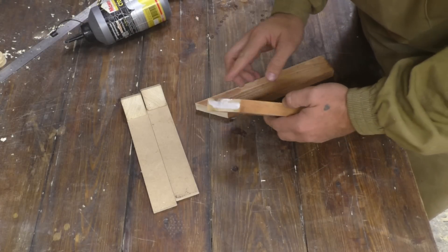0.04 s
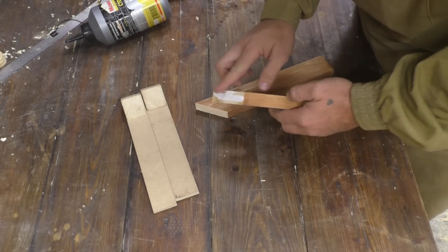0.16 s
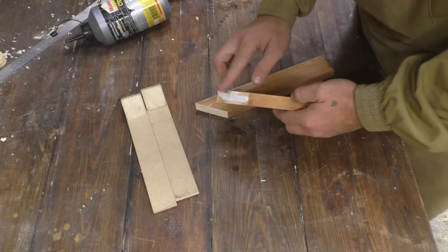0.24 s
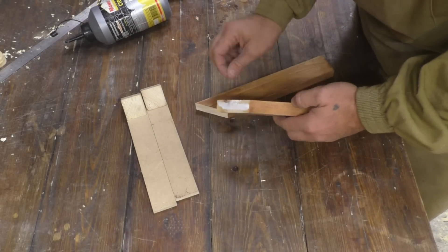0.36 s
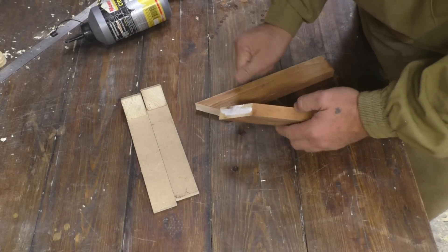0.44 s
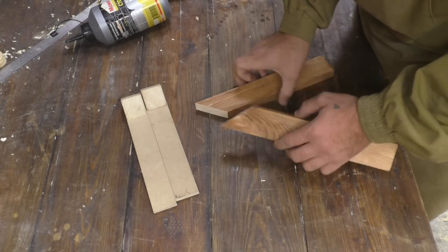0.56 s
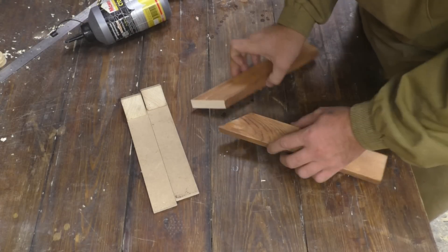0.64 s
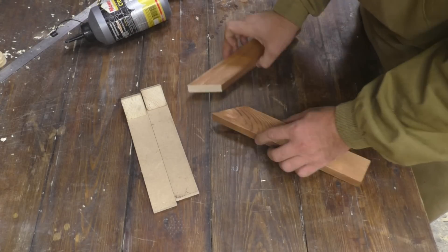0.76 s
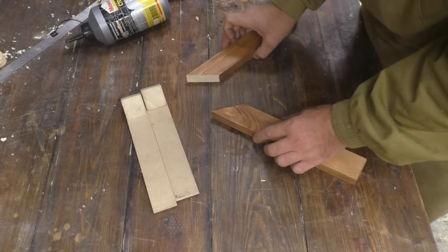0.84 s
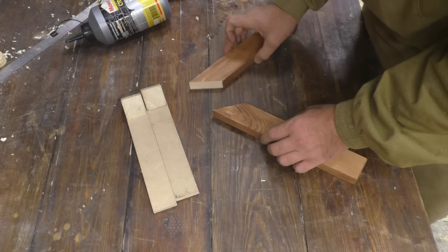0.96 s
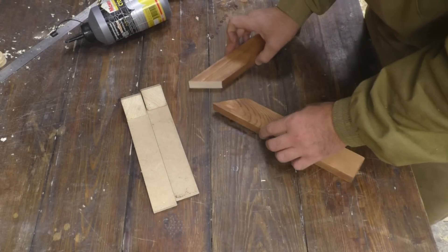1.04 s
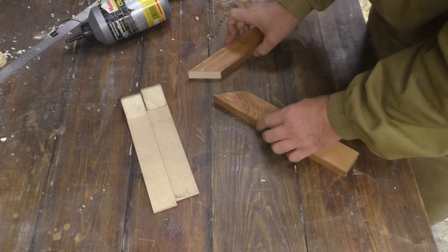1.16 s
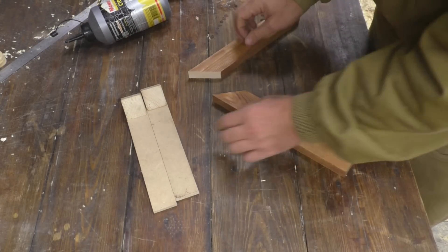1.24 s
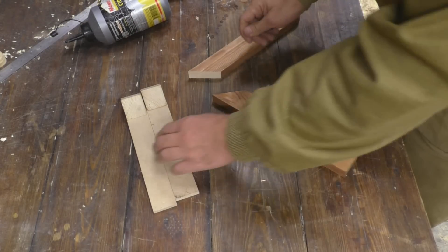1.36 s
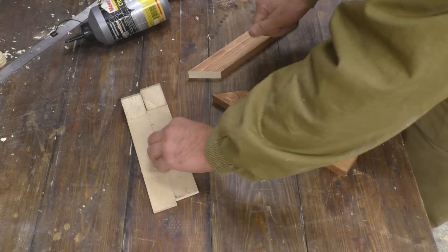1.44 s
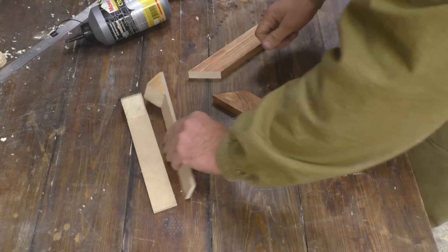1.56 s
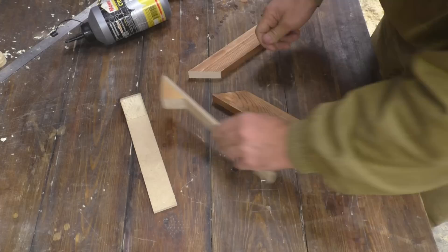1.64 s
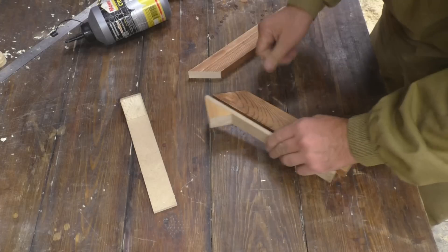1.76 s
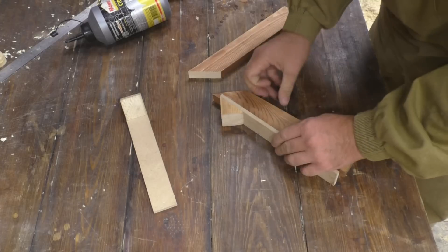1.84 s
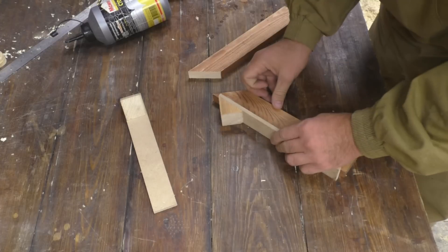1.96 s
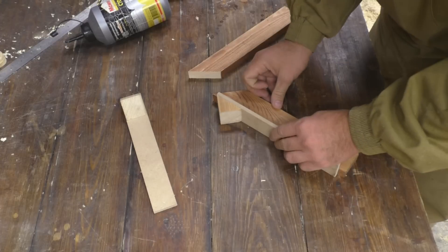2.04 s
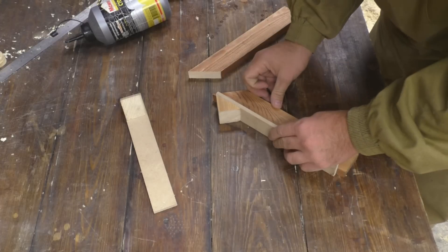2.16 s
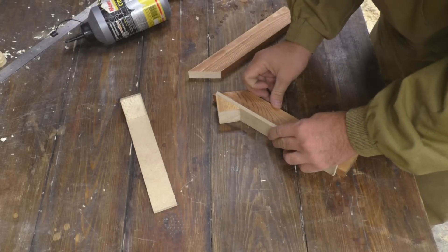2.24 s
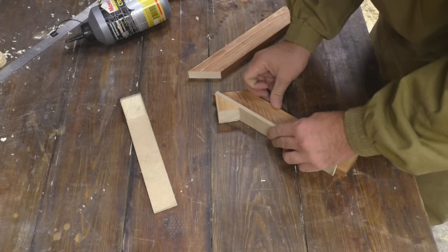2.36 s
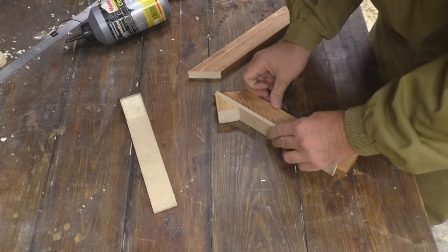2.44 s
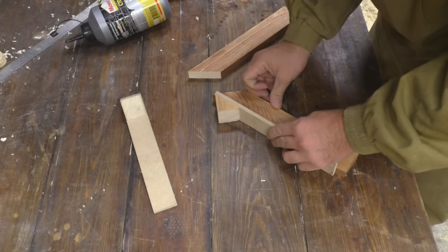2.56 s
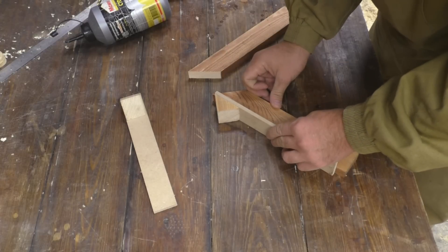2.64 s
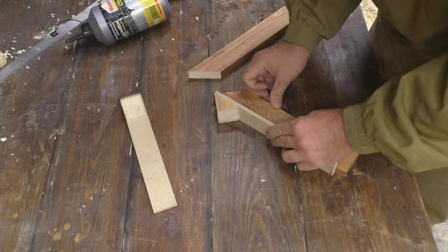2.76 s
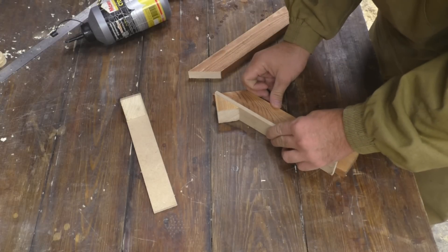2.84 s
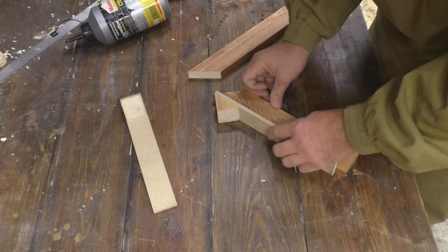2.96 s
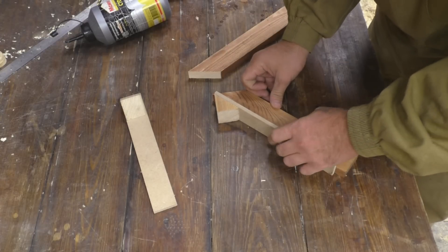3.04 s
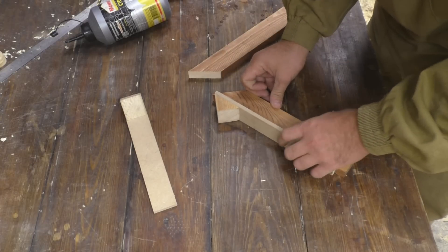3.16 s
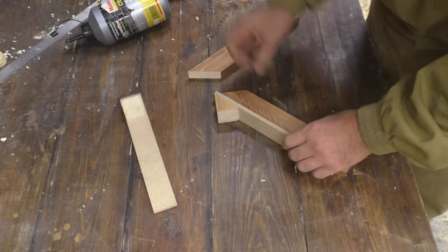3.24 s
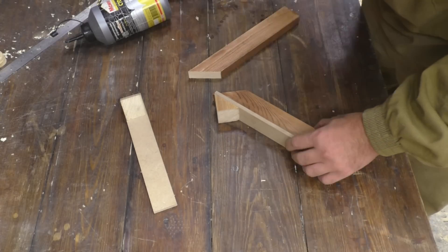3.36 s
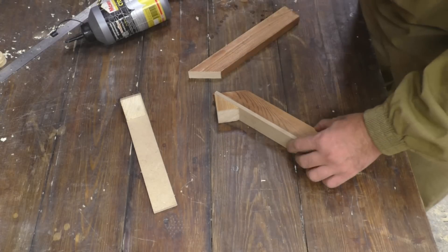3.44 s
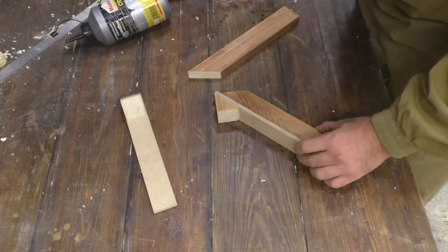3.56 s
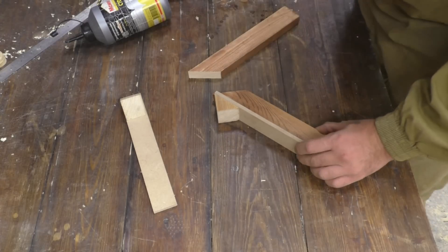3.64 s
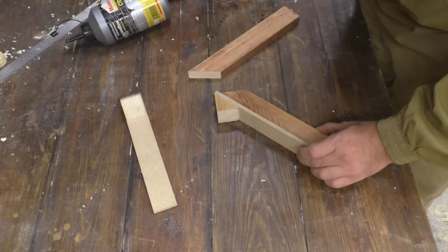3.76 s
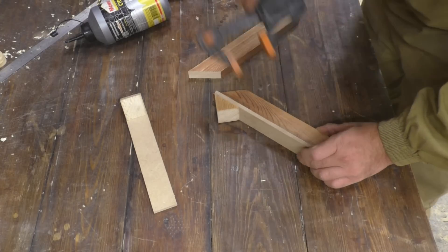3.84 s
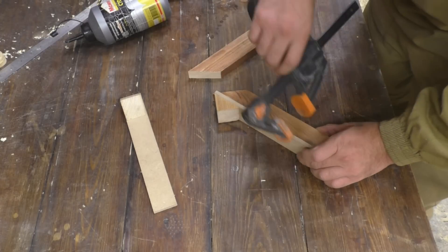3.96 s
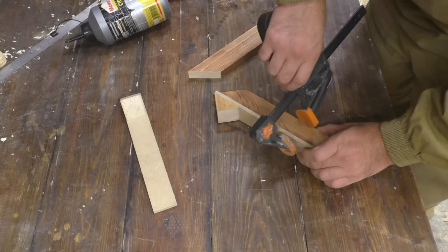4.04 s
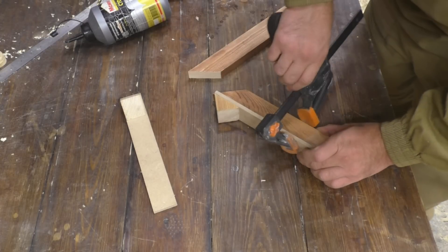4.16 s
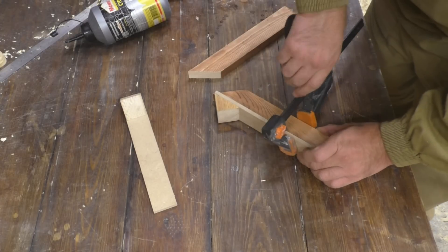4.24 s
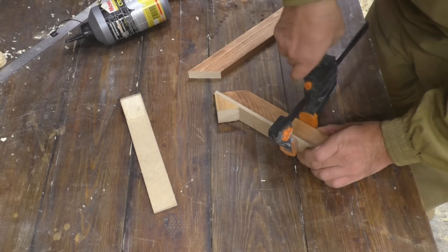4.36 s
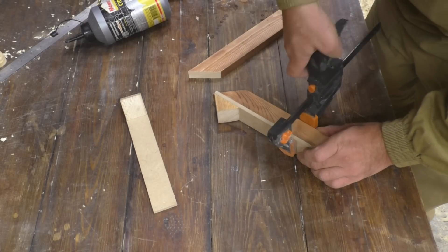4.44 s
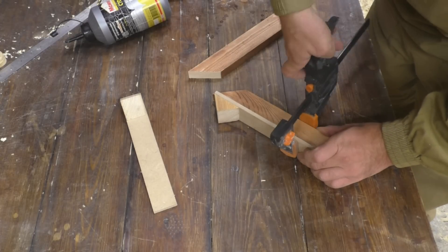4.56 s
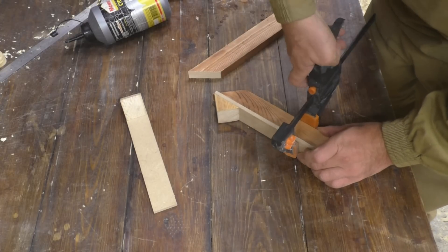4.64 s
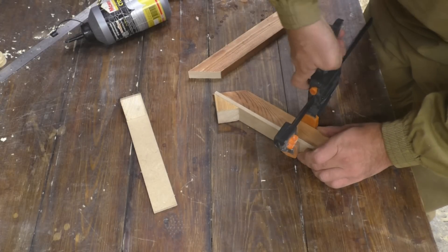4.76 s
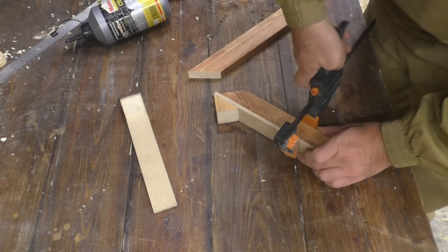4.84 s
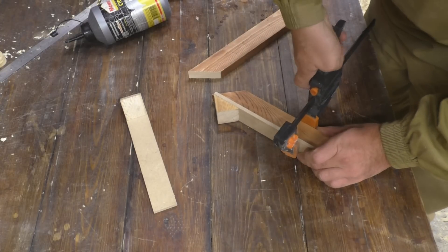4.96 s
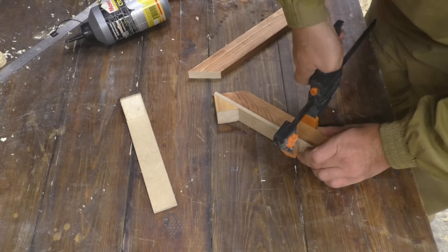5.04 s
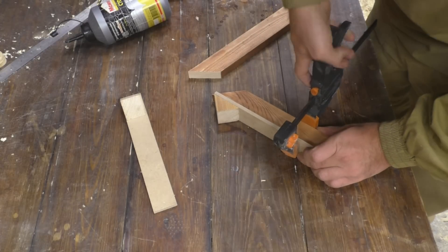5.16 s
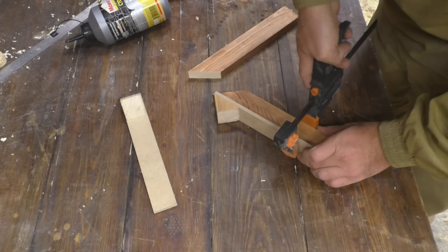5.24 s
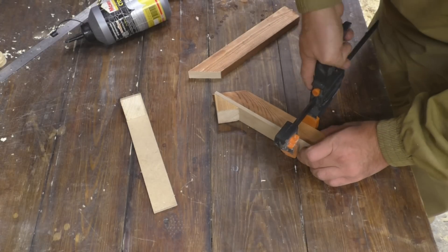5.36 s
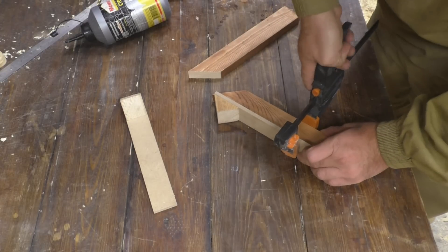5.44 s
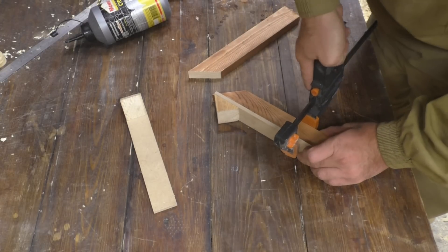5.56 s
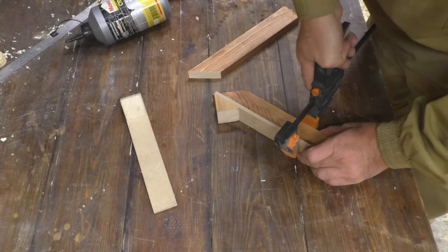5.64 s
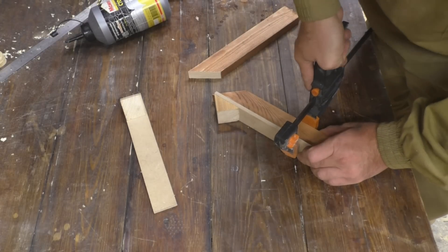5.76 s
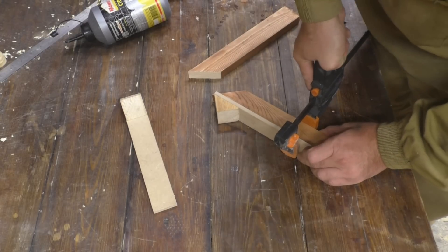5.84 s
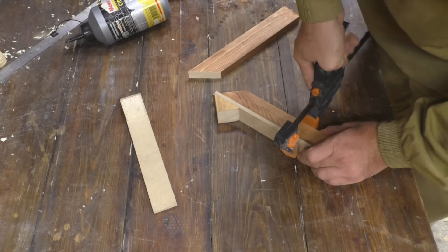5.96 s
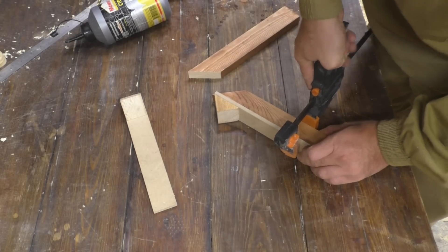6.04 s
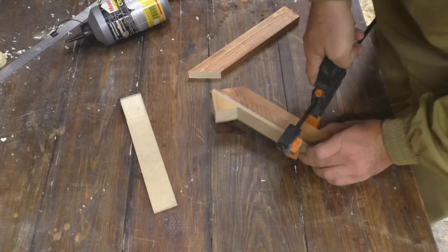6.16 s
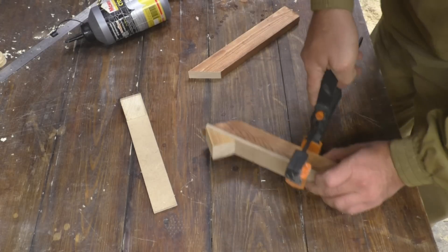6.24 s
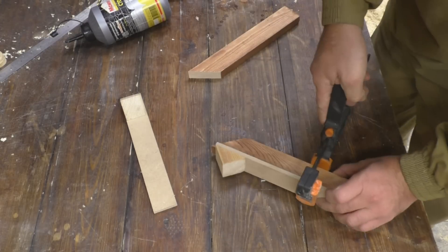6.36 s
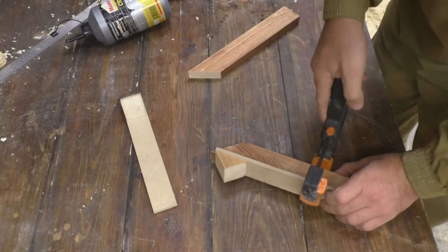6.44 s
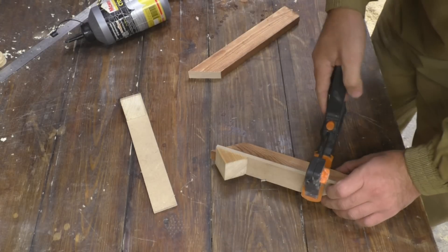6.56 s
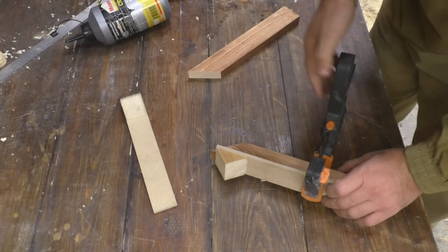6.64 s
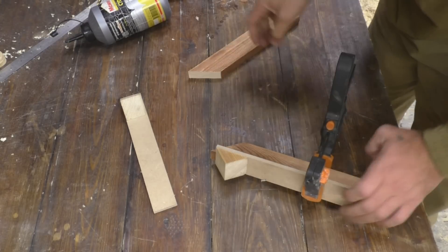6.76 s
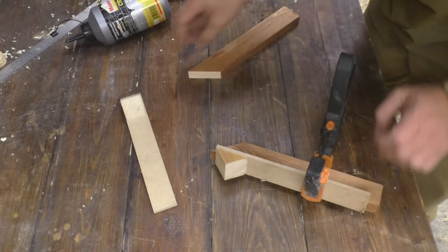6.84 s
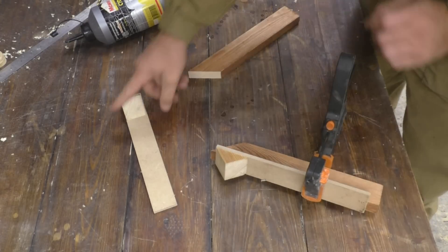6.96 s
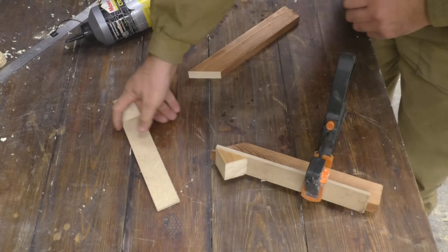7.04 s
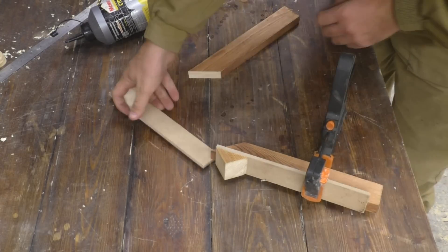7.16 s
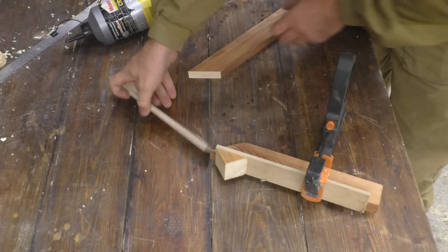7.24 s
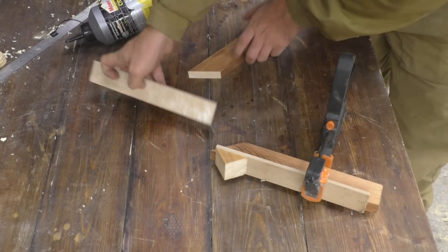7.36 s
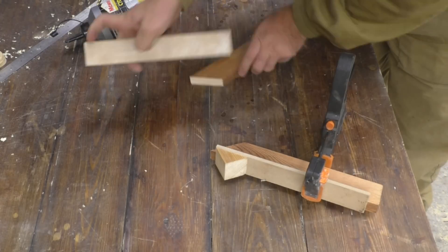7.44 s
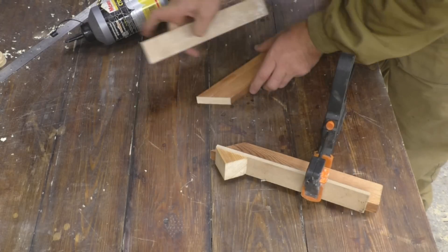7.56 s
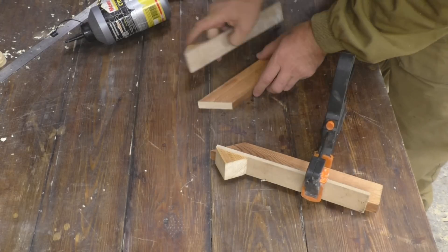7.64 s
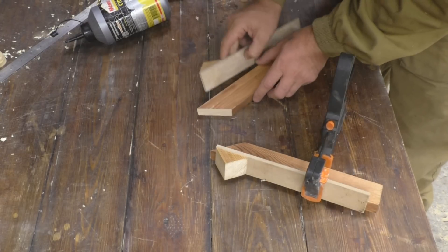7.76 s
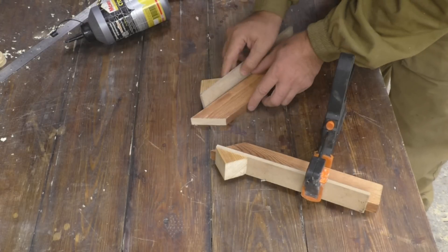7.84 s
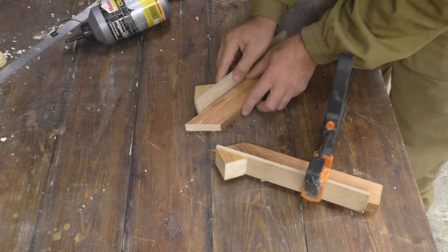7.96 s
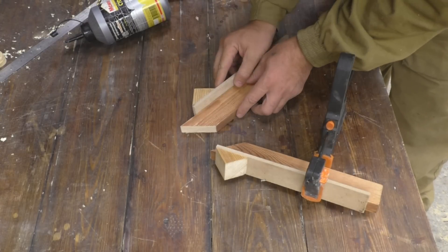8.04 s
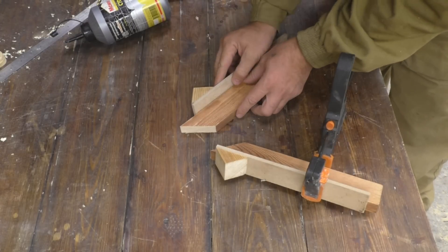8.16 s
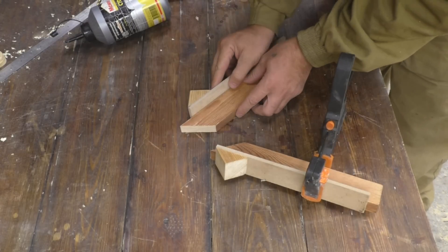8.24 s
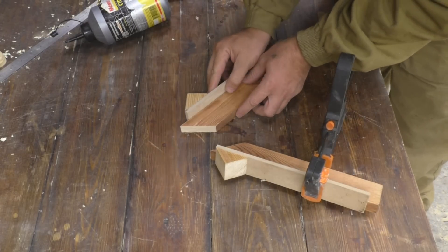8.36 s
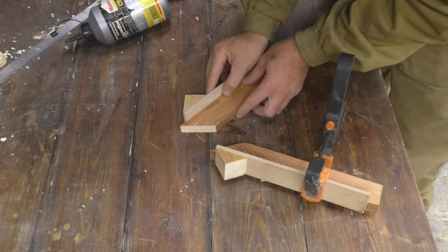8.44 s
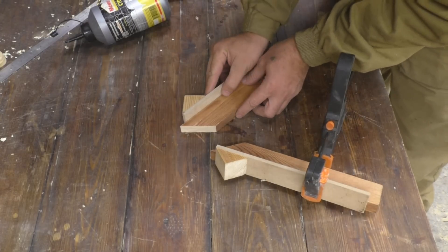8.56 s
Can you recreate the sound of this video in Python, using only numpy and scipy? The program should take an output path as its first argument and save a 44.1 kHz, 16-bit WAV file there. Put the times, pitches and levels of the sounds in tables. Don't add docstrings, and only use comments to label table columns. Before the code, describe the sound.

Close workshop handling: sharp wooden clacks and gritty scrapes, crisp ratchet snaps of a clamp, a dull drop, then more strip knocks.

```python
import sys
import numpy as np
from scipy import signal
from scipy.fft import rfft, irfft, next_fast_len
from scipy.io import wavfile
from scipy.ndimage import uniform_filter1d

SR = 44100
rng = np.random.default_rng(int(sys.argv[2]) if len(sys.argv) > 2 else 0)


def how_loud(loudness_db):
    steps = np.asarray(loudness_db, float) / 20
    return 10 ** steps


def digitize_waveform(pressure):
    field = np.atleast_2d(pressure).T
    bounded = np.clip(field, -1, 1)
    quanta = np.round(bounded * 32767).astype(np.int16)
    wavfile.write(sys.argv[1], SR, quanta)


N = 379701
RING = 5120


def read(table, hz, count=1):
    rows = np.array(table, float)
    return np.interp(np.log(hz), np.log(rows[:, 0]), rows[:, count])


def unit(x):
    return x / np.sqrt(np.mean(x ** 2))


def peak(sound, db):
    return how_loud(db) * sound / np.sqrt(uniform_filter1d(sound ** 2, size=256).max())


def pan(x, db):
    return x * how_loud(np.array([[db], [-db]]) / 2)


def decay(t, t60):
    return np.exp(-np.log(1000) * t / t60)


def walk(rate):
    k = int(SR / rate)
    steps = np.repeat(rng.standard_normal(N // k + 1), k)
    return unit(uniform_filter1d(uniform_filter1d(steps, k), k)[:N])


def resonate(x, bands):
    hz = np.fft.rfftfreq(RING, 1 / SR) + 1
    power = sum(how_loud(db) ** 2 / (1 + ((hz - f * f / hz) / width) ** 2) ** 2 for f, width, db in bands)
    cepstrum = irfft(np.log(power + 1e-12))
    cepstrum[0] /= 2
    response = irfft(np.exp(rfft(cepstrum[:RING // 2], RING)))[:RING // 2]
    return signal.oaconvolve(np.atleast_2d(x), response[None], axes=1)[:, :x.shape[-1]].reshape(x.shape)


# pitch_hz, density_db
SHOP_AIR = [(15, -44), (25, -8.5), (76, -5), (384, -3.5), (695, -6), (796, -9.5), (863, -10), (1190, -21),
            (1610, -22), (1890, -13), (2550, -11), (5880, -16.5), (12500, -29.5), (14800, -23.5),
            (16000, -32.5)]
# pitch_hz, side_minus_mid_db
SHOP_SIDE = [(60, -1), (110, -3), (200, -0.5), (380, 0), (700, -0.5), (1290, -4.5), (2380, -2), (4400, -1),
             (8120, -0.5), (15000, -3)]
# pitch_hz, level_db
HUM = [(99.5, -94), (199.2, -84.5), (398.5, -84), (801, -80.5)]


def shop():
    size = next_fast_len(N, real=True)
    hz = np.fft.rfftfreq(size, 1 / SR) + 1
    mid, side = rfft(rng.standard_normal((2, N)), size) * how_loud(read(SHOP_AIR, hz))
    side = side * how_loud(read(SHOP_SIDE, hz))
    air = unit(irfft(np.array([mid + side, mid - side]), size)[:, :N])
    air = air * how_loud(-64.5 + 0.27 * walk(2.2))
    for pitch_hz, db in HUM:
        phase = 2 * np.pi * pitch_hz * np.arange(N) / SR + 0.83 * walk(3.4)
        air = air + np.sqrt(2) * how_loud(db) * np.sin(phase)
    return air


# pitch_hz, level_db, t60_s
ECHO = [(100, 4.5, 0.27), (584, 2, 0.15), (2510, -4, 0.21), (6000, -6, 0.16), (13800, -3.5, 0.14)]


def echo():
    echo_db, side_gain = -11, .85
    t, tail = np.arange(RING) / SR, 0
    for hz in 100 * 2 ** np.arange(0, 7.5, .5):
        noise = resonate(rng.standard_normal((2, RING)), [(hz, hz / 2, 0)]) / np.sqrt(hz)
        width = np.array([[1], [np.clip(hz / 1800, .45, 1.2)]])
        fade = decay(t, read(ECHO, hz, count=2))
        tail = tail + np.sqrt(hz) * how_loud(read(ECHO, hz)) * noise * fade * width
    tail = tail * (1 - np.exp(-(t / 0.00085) ** 2))
    tail = tail[0] + side_gain * tail[1] * np.array([[1], [-1]])
    return how_loud(echo_db) * tail / np.sqrt(np.sum(tail ** 2) / 2)


def strokes(rows):
    rise, fall = 0.3, 0.63
    start, length, db = np.transpose(rows)[:3, :, None]
    along = (np.arange(N * 1000 // SR + 2) / 1000 - start) / length
    return how_loud(db) * np.clip(np.minimum(along / rise, (1 - along) / fall) + .5, 0, 1) ** 2


def held(gain):
    return np.interp(np.arange(N) / SR * 1000, np.arange(len(gain)), gain)


# start_s, length_s, pressure_db, bench_over_block_db
SHOVES = [(0.582, 0.17, -54, -27), (0.813, .19, -53, -8.5), (0.995, 0.28, -54.5, -20),
          (1.295, 0.41, -66, -1), (1.736, 0.41, -74, 0), (2.923, 0.28, -75.5, -3),
          (3.397, 0.33, -62.5, 0.5), (4.416, 0.29, -65, 0.5), (4.738, 0.34, -63.5, 7.5),
          (5.084, 0.51, -66, -5.5), (5.651, 0.12, -57.5, -2.5), (5.816, 0.26, -56.5, -10),
          (6.506, 0.49, -67.5, -16), (6.918, 0.87, -56, -9), (7.185, 0.2, -49, -5),
          (7.475, .15, -46.5, -38), (7.671, .14, -47.5, -26), (7.813, 0.11, -45, -11.5),
          (7.929, 0.16, -49.5, -18), (8.195, 0.29, -57, -13)]
# start_s, length_s, pressure_db, hiss_over_rasp_db
BRUSHES = [(0.194, 0.031, -65, -0.5), (0.409, 0.12, -64, 2), (0.535, 0.45, -57.5, -3),
           (0.998, 0.29, -59, -3.5), (1.295, 0.43, -59, 0.3), (1.667, 0.54, -65.5, -2),
           (2.9, 0.66, -72, 1.5), (3.397, 0.13, -61.5, -1), (3.511, 0.27, -54.5, -1.5),
           (3.83, 0.23, -67.5, 1.5), (4.184, 0.51, -62, -3), (4.634, 0.57, -65.5, -1),
           (5.226, 0.3, -63.5, -3.5), (5.55, 0.4, -68.5, -3.5), (5.875, 0.22, -65, -2.5),
           (6.085, 0.11, -59, -0.5), (6.23, 0.05, -64, -6), (6.469, 0.076, -58.5, -6),
           (6.596, 0.37, -64, -2.5), (1.948, .035, -61, 2.5), (6.888, 0.23, -60, -4.5),
           (7.0, 0.066, -62.5, -1), (7.061, 0.081, -54, -3.5), (7.13, 0.25, -58, -8),
           (7.162, 0.41, -62.5, 4), (7.425, 0.28, -56, 1.5), (7.677, 0.17, -55.5, 0),
           (7.824, 0.15, -55, -1), (7.958, 0.19, -57, -5), (8.162, 0.39, -62.5, -12)]
# pitch_hz, width_hz, level_db
RUB_BANDS = [
    [(164.4, 43, -1.5), (267, 77, -9.5)],
    [(402, 170, -2.5), (440, 275, -4), (606, 170, 4), (807, 320, -0.5), (1340, 510, -15)],
    [(2120, 450, -5.5), (2990, 3000, -3.5), (4400, 3500, -6)],
    [(6600, 1670, 6.5), (7960, 3160, -2), (13000, 14400, -3)],
]


def rubbing():
    wood, cloth = strokes(SHOVES), strokes(BRUSHES)
    bench = how_loud(np.array(SHOVES)[:, 3]) @ wood
    hiss = how_loud(np.array(BRUSHES)[:, 3]) @ cloth
    levels = [bench, wood.sum(axis=0), cloth.sum(axis=0), hiss]
    grit = rng.standard_normal(N) * how_loud(1.2 * rng.exponential(size=N) + 2.02 * walk(120))
    pressure = 1.1 * walk(25)
    out = 0
    for bands, gain in zip(RUB_BANDS, levels):
        flicker = 1.8 * walk(20)
        out = out + unit(resonate(grit, bands)) * held(gain) * how_loud(-3.0 + pressure + flicker)
    return pan(out, -0.3)


def sliding(rows, bands):
    grit = rng.standard_normal(N) * how_loud(2.0 * rng.exponential(size=N) + 2.2 * walk(140))
    gain = held(strokes(rows).sum(axis=0))
    moving, out = gain > 0, np.zeros(N)
    hiss = sum(resonate(grit[moving], [band]) * how_loud(1.1 * walk(25)[moving]) for band in bands)
    out[moving] = unit(hiss) * gain[moving] * how_loud(-4.0)
    return out


# start_s, length_s, level_db
SLIDES = [
    (.625, 0.053, -52),
    (.85, 0.043, -57),
    (.945, 0.051, -48),
    (.995, 0.057, -50.5),
    (1.08, 0.12, -48),
    (7.495, 0.11, -41),
    (7.675, 0.049, -49.5),
    (7.76, 0.37, -56),
    (7.84, 0.094, -55),
    (8.25, 0.24, -61.5),
]
# pitch_hz, width_hz, level_db
SLIDE_HISS = [(3380, 1200, -5), (6110, 590, 4.5), (6630, 780, 5.5), (8080, 1240, 1.5), (9230, 910, -10.5),
              (10930, 570, -11), (12400, 740, -5), (9700, 32000, -8)]


def block_slides():
    return pan(sliding(SLIDES, SLIDE_HISS), -0.3)


# start_s, length_s, level_db
STRIP_SLIDES = [
    (7.49, .13, -59),
    (7.655, 0.076, -59),
    (7.74, 0.094, -60),
    (7.83, 0.075, -53),
    (7.97, 0.026, -55.5),
    (8.0, 0.074, -63),
]
# pitch_hz, width_hz, level_db
STRIP_SONG = [(1750, 25, 3), (2164, 100, 0.5), (3200, 58, -5), (3740, 57, -2), (4060, 35, -8)]


def strip_slides():
    return pan(sliding(STRIP_SLIDES, STRIP_SONG), -0.33)


# start_s, length_s, level_db
BAR_SLIDES = [
    (4.225, 0.11, -57.5),
    (4.31, 0.079, -57.5),
    (4.41, .035, -63),
    (4.46, 0.064, -58.5),
    (4.515, 0.019, -53),
    (3.89, 0.036, -64),
]
# pitch_hz, width_hz, level_db
BAR_SCRAPE = [(4530, 820, 2), (5500, 600, 6.5), (6700, 900, -0.5), (8600, 2500, -5.5)]


def bar_slides():
    return pan(sliding(BAR_SLIDES, BAR_SCRAPE), -1.4)


# start_s, length_s, level_db
PICKUP = [
    (3.548, 0.015, -43.5),
]
# pitch_hz, width_hz, level_db
PICKUP_BANDS = [(3300, 1500, -8), (6050, 1200, 1), (9000, 900, 2), (11000, 3100, -10)]


def lift_scrape():
    return pan(sliding(PICKUP, PICKUP_BANDS), -.6)


def ring(modes, push, db, loose):
    hz, mode_db, t60 = np.transpose(modes)[:, :, None]
    pitch_luck = .012 * loose * rng.standard_normal((len(hz), 1))
    level_luck = 2 * loose * rng.standard_normal((len(hz), 1))
    t = np.arange(RING) / SR
    tone = np.sin(2 * np.pi * hz * (1 + pitch_luck) * t) * decay(t, np.clip(t60, .01, .25))
    sign = (-1) ** np.arange(len(hz))[:, None]
    body = np.sum(how_loud(mode_db + level_luck) * sign * tone, axis=0)
    return peak(signal.fftconvolve(body, push[:2048])[:RING], db)


def crack(bands, push, db, loose):
    luck = loose * rng.standard_normal((len(bands), 3)) * [.03, 0, 2]
    shifted = np.array(bands) * (1 + luck * [1, 0, 0]) + luck * [0, 0, 1]
    return peak(resonate(push, shifted), db)


# pitch_hz, level_db, t60_s
BENCH = [(169.6, -2, 0.14), (272, -3, 0.056), (341, -2.5, 0.1), (376, 2.5, 0.047), (496, -9, 0.097)]
# pitch_hz, level_db, t60_s
KNOCK = [(417, -2.5, 0.02), (591, -3, 0.033), (616, -1.5, 0.048), (730, 1.5, 0.026), (797, -5.5, 0.059),
         (904.6, -5, 0.056), (1100, -13.5, 0.022)]


def contacts(hits, bench, clack, tick, planks_db, touch_ms=None, knock=KNOCK, loose=1, scatter_db=-26, blunt=1):
    out, t = np.zeros(N + RING), np.arange(RING) / SR
    for s, clack_db, body_db, edge_db, *skid_ms in hits:
        knock_db, tick_db = clack_db + body_db, clack_db + edge_db
        ms = touch_ms or skid_ms[0]
        noise = rng.standard_normal((3, RING))
        soft = blunt * np.clip((-32 - max(clack_db, tick_db + 5)) / 15, 0, 1)
        push = 0.67 * noise[0] * np.exp(-(1000 * t / (max(ms, .1) + 4.7 * soft)) ** 3)
        push = push * (1 - np.exp(-t / (0.00025 + 0.00011 * soft)))
        push[8] += 1.36 * (1 - soft)
        swell = (1 - np.exp(-t / .001)) * np.sqrt(np.sum(push ** 2))
        body_tail = swell * how_loud(-32.0) * noise[2] * decay(t, 0.073)
        clack_tail = swell * how_loud(scatter_db) * noise[1] * decay(t, 0.097)
        tick_tail = swell * how_loud(-36.5) * noise[2] * decay(t, 0.1)
        sound = ring(bench, push, knock_db + planks_db + 1.0, loose)
        sound += ring(knock, push + body_tail, knock_db - 0.5, loose)
        sound += crack(clack, push + clack_tail, clack_db - 6.5, loose)
        sound += crack(tick, push + tick_tail, tick_db - 7.0, loose)
        start = int(s * SR)
        out[start:start + RING] += sound
    return out[:N]


# start_s, level_db, body_db, edge_db, contact_ms
SKIDS = [
    (3.5912, -49, 0.5, -12, 34),
    (3.6172, -41.5, -7, -2, 8.1),
    (3.6705, -34, -16.5, -5.5, 33),
    (4.5221, -56, -5, 15.5, 3.5),
    (7.1465, -29.5, -3, -8, 12),
    (7.198, -31.5, -4, -9.5, 7.9),
    (7.3003, -38, 4.5, -1, 22),
    (7.4929, -45.5, -0.5, -15, 11.5),
    (7.8274, -49.5, 5, -8, 68),
]
# pitch_hz, width_hz, level_db
SKID_CLACK = [(1325, 250, 5.5), (1990, 390, 4), (2770, 1500, 7), (3370, 340, 7.5), (4000, 600, -21)]
# pitch_hz, width_hz, level_db
SKID_TICK = [(6100, 1700, 1.5), (7040, 840, -4), (8500, 1000, -2.5), (9540, 1800, -5), (12140, 750, -6),
             (15100, 2500, -10)]


def skids():
    return pan(contacts(SKIDS, BENCH, SKID_CLACK, SKID_TICK, planks_db=-12.5), -0.3)


# start_s, level_db, body_db, edge_db, contact_ms
SQUEAKS = [
    (0.4424, -58.5, -10, 12.5, 2.6),
    (0.6885, -40.5, -18, 1.9, 21),
    (0.8444, -64, 17, 15, 12),
]
# start_s, level_db, body_db, edge_db, contact_ms
SQUEAK_SLIPS = [
    (0.7035, -47, -20, 4, 3),
    (0.7193, -51, -20, 10, 1.5),
    (0.8708, -50, -20, 22, 1.2),
]
# pitch_hz, width_hz, level_db
SQUEAK_CLACK = [(3680, 180, 10), (2600, 2400, -9)]
# pitch_hz, width_hz, level_db
SQUEAK_TICK = [(8150, 310, 7.5), (12900, 680, 2.5), (6300, 4300, -5)]


def squeaks():
    main = contacts(SQUEAKS, BENCH, SQUEAK_CLACK, SQUEAK_TICK, planks_db=-18, loose=0.18)
    slips = contacts(SQUEAK_SLIPS, BENCH, SQUEAK_CLACK, SQUEAK_TICK, planks_db=-18, loose=.2, blunt=.2)
    return pan(main, -.4) + pan(slips, -.6)


# start_s, level_db, body_db, edge_db
LOOSE_TICKS = [
    (0.196, -69, -20, 14),
    (3.7, -52, -17, 8),
    (6.3812, -49, -20, -9),
    (4.2525, -46, -20, -3),
]
# pitch_hz, width_hz, level_db
CLAMP_CLACK = [(1340, 380, -7), (2250, 1100, -2), (3580, 1300, 0.5), (4150, 650, 2), (4110, 590, -2.5)]
# pitch_hz, width_hz, level_db
CLAMP_TICK = [(4930, 1100, 4), (6260, 1150, 1.5), (7880, 1900, -6.5), (10540, 2400, -13.5),
              (14500, 31000, -16)]


def loose_ticks():
    ticks = contacts(LOOSE_TICKS, BENCH, CLAMP_CLACK, CLAMP_TICK, planks_db=-16, touch_ms=.6, loose=.4, blunt=0.16)
    return pan(ticks, -.6)


# start_s, level_db, body_db, edge_db
BLOCK_TAPS = [(0.195, -69, -28, 11), (0.5786, -52.5, -3.5, -10), (0.7324, -43.5, -0.5, -16),
              (0.9931, -42.5, -4.5, -20), (1.1914, -49, 8.5, -20), (1.4635, -77, 3, 23),
              (1.5054, -52.5, 6.5, -6), (1.6194, -44.5, 1, -16), (1.7285, -60.5, -11, 11),
              (1.826, -51.5, 3, -22), (1.9747, -35.5, -5, -22), (2.0294, -56, 7.5, 1),
              (2.8757, -72, 2, -14), (3.243, -63, 2.5, 5)]
# start_s, level_db, body_db, edge_db
BLOCK_KNOCKS = [
    (0.611, -40.5, 0.5, -26),
    (0.7193, -42, -7, -14),
    (0.7816, -45.5, 0, -4),
]
# pitch_hz, width_hz, level_db
BLOCK_CLACK = [(1310, 430, 3.5), (1800, 30, 10), (2160, 530, 6.5), (3100, 2750, -4), (4600, 580, -21)]
# pitch_hz, width_hz, level_db
WOOD_TICK = [(5530, 1200, 18.5), (6240, 1300, 8.5), (8350, 420, 5), (10800, 3300, -22), (13500, 400, -9),
             (16800, 6500, -1)]


def block_contacts():
    taps = contacts(BLOCK_TAPS, BENCH, BLOCK_CLACK, WOOD_TICK, planks_db=-7.5, touch_ms=1.9)
    knocks = contacts(BLOCK_KNOCKS, BENCH, BLOCK_CLACK, WOOD_TICK, planks_db=-15.5, touch_ms=1.1, blunt=.3)
    return pan(taps + knocks, -0.87)


# start_s, level_db, body_db, edge_db
CLAMP_LANDINGS = [
    (3.4387, -63.5, 0, 8),
    (3.878, -55.5, -3.5, -12),
    (4.1473, -41.5, 3.5, -2),
    (4.1708, -33, -10, -16),
    (4.2133, -39.5, -6, -16),
    (4.2478, -32, 2.5, -12),
    (3.593, -58, 15.5, -10),
    (8.0681, -50, 12.5, -13),
]


def clamp_landings():
    landed = contacts(CLAMP_LANDINGS, BENCH, BLOCK_CLACK, CLAMP_TICK, planks_db=-4.0, touch_ms=2.2, blunt=.6)
    return pan(landed, -1.2)


# start_s, level_db, body_db, edge_db
CLAMP_BUMPS = [(4.3819, -60, 1, 8), (4.7475, -41, -8, 1.5), (4.79, -66, -4, -14), (4.8785, -41.5, -23, -5),
               (4.8922, -47.5, 0.5, 0.5), (5.1214, -51.5, -10, 1), (5.3137, -51.5, -11, -3),
               (5.669, -65.5, 10, -7), (5.7021, -52.5, 2, 0.5), (5.9315, -44, -24, 2.5),
               (6.0215, -54, -10, -15), (6.1065, -58.5, -2, -10), (6.2447, -52.5, -33, -26.5),
               (6.294, -46, -20, -1)]


def clamp_bumps():
    return pan(contacts(CLAMP_BUMPS, BENCH, CLAMP_CLACK, CLAMP_TICK, planks_db=0.8, touch_ms=2.1), -1.6)


# start_s, level_db, body_db, edge_db
RATCHET = [(4.4295, -54, 0.5, 2), (4.4848, -48, -27, 3), (4.5773, -32, -10, 4.5), (4.8182, -56, 5.5, -7),
           (4.9046, -25, -20, 12.5), (4.9906, -39, -15, -10), (5.1432, -39.5, -12, 5),
           (5.1537, -25.5, -12.5, 6.5), (5.4011, -56, -9, 3), (5.5036, -44, -11, -8),
           (5.5311, -35, -20.5, 5), (5.832, -34, -21, 3.5), (5.903, -54.5, 2, -3),
           (5.9582, -42.5, -17, 4.5)]
# pitch_hz, width_hz, level_db
RATCHET_TICK = [(4610, 690, -2), (6150, 1500, 1), (7900, 1000, -4.5), (10300, 3200, -12.5),
                (14600, 22000, -16.5)]


def ratchet():
    clicks = contacts(RATCHET, BENCH, CLAMP_CLACK, RATCHET_TICK, planks_db=-15.5, touch_ms=1.15, loose=0.67,
                      scatter_db=-27)
    return pan(clicks, -1.6)


# start_s, level_db, body_db, edge_db
DROP = [
    (6.3859, -35.5, 1.9, -1.5),
]
# pitch_hz, level_db, t60_s
DROP_BENCH = [(173, 5, .15), (280, -6, .03), (339, -4, .12), (390, -16, 0.5), (507, -13, -0.1)]
# pitch_hz, width_hz, level_db
DROP_CLACK = [(1300, 200, -2), (2110, 350, 5), (2380, 980, -8), (3200, 1500, -14), (4600, 600, -14)]


def drop():
    fall = contacts(DROP, DROP_BENCH, DROP_CLACK, CLAMP_TICK, planks_db=5, touch_ms=0.4, loose=.15, blunt=.1)
    return pan(fall, -1.5)


# start_s, level_db, body_db, edge_db
SETTLING = [
    (6.528, -58, 2.5, -8),
    (6.5859, -22.5, -5, -8),
    (6.728, -53, -16, -1),
]
# pitch_hz, level_db, t60_s
BENCH_FAR = [(168, -14, 0.2), (240, -0.5, 0.02), (354, 5, 0.053), (422, 4, 0.022), (504, 3, 0.054)]
# pitch_hz, width_hz, level_db
CLAMPED_PAIR = ([(527, -7.5, 0.032), (666, -2.5, 0.04), (770, -5, 0.041), (902, -4.5, .04)],
                [(1315, 200, -6.5), (1800, 410, -0.5), (2556, 200, -4), (3620, 280, 0.5), (4120, 270, -4),
                (2670, 2500, -7)])


def settling():
    modes, clack = CLAMPED_PAIR
    rest = contacts(SETTLING, BENCH_FAR, clack, WOOD_TICK, planks_db=1.5, touch_ms=0.33, knock=modes, loose=0.32)
    return pan(rest, -1.4)


# start_s, level_db, body_db, edge_db
SECOND_TAPS = [
    (7.0155, -60, -15, 0),
    (7.0346, -45.5, -2, -3.5),
    (7.4325, -59, 1, -3),
    (8.3861, -68, 2, -2),
]
# start_s, level_db, body_db, edge_db
SECOND_KNOCKS = [
    (7.1847, -45, 8.5, -19),
    (7.279, -44.5, 6.5, -19),
    (7.7863, -46, -7, -14),
    (7.829, -56, 12, -13),
    (7.9463, -51.5, 4.5, -11),
    (8.0124, -59.5, 10.5, 1),
]
# pitch_hz, width_hz, level_db
SECOND_CLACK = [(1420, 510, 2), (1720, 150, 8), (2040, 190, 4), (2420, 620, 3.5), (3360, 3400, -2)]


def second_contacts():
    taps = contacts(SECOND_TAPS, BENCH_FAR, SECOND_CLACK, WOOD_TICK, planks_db=-1.0, touch_ms=2.0)
    knocks = contacts(SECOND_KNOCKS, BENCH_FAR, SECOND_CLACK, WOOD_TICK, planks_db=-18, touch_ms=.8)
    return pan(taps + knocks, -0.39)


# pitch_hz, width_hz, level_db
FLAT_FACE = ([(496, -13, 0.13), (636, 0.5, -0.02), (725, -1, 0.05), (856, -6.5, .07), (1190, -2, -0.03)],
             [(1465, 270, -7), (1750, 91, 2.5), (2120, 250, 4), (2340, 180, 0), (2530, 220, -4),
             (2230, 2060, -9.5)])
NARROW_EDGE = ([(370, -2.5, 0.067), (526, -4.5, 0.046), (696, 3, 0.081), (844, -7, 0.048),
               (1040, -8, 0.034)], [(1590, 350, -2), (1900, 300, -1.5), (2560, 440, -3), (2900, 400, -9),
               (2620, 1800, -6)])
LIFTED_STRIP = ([(460, -6.5, 0.048), (641, -0.5, 0.039), (747, -3.5, 0.048), (904, -3.5, 0.03),
                (1030, -3.5, 0.039)], [(1540, 1300, -10), (2310, 150, -1), (3070, 300, -4), (3830, 220, 2),
                (4420, 330, -3), (3470, 2270, -7)])
LAID_STRIP = ([(463, -9.5, 0.041), (620, -0.5, 0.029), (690, 3, 0.028), (904, -11, .03), (1080, -15, .03)],
              [(1400, 900, -5), (2380, 290, 2.5), (3130, 210, -14), (3900, 360, 1), (4700, 400, -5),
              (2900, 2600, -2.5)])
TIPPED_STRIP = ([(540, 0.5, 0.042), (644, 0, 0.077), (784, 1, 0.046), (940, 3, 0.06), (1083, -5.5, .03)],
                [(1400, 230, -8), (2140, 180, 2), (2580, 200, 2), (2850, 240, 3), (4180, 330, -26),
                (2600, 2000, -3)])
SECOND_FACE = ([(477, -4, 0.052), (643, 3, 0.06), (740, 0, .04), (865, 0, 0.056), (1140, -7, 0.026)],
               [(1210, 190, 0), (1530, 110, 4), (1720, 57, 11), (2080, 150, 3), (2400, 150, 1.5),
               (3680, 430, -2.5), (2350, 2900, -8.5)])
SECOND_EDGE = ([(463, -8, .04), (612, 2.5, 0.042), (766, -3, 0.035), (895, 0, 0.041), (1110, -13.5, 0.026)],
               [(1370, 410, -8), (1750, 190, -6.5), (2160, 300, -1), (2880, 300, -4), (3950, 410, -7.5),
               (4700, 400, -6.5), (2830, 2150, -4.5)])
# face, blows (start_s, level_db, body_db, edge_db), contact_ms
LANDINGS = [
    (FLAT_FACE, [(0.8707, -18.5, -10.5, -1.8)], 1),
    (NARROW_EDGE, [(1.1958, -30.5, -0.5, -1)], 1.6),
    (LIFTED_STRIP, [(1.574, -48, 8, -10), (1.5791, -21.5, -8.5, -9.5), (7.2347, -33.5, -4, -23)], 1.42),
    (LAID_STRIP, [(1.8553, -24.5, -7, -28), (1.8716, -18.5, -9.5, -6.5)], 1.13),
    (TIPPED_STRIP, [(7.3236, -21.5, -8.5, -18)], 2.35),
    (SECOND_FACE, [(7.7138, -22, -12.5, -20)], 1),
    (SECOND_EDGE, [(8.0681, -19.5, -13.5, -14)], 1.3),
]


def landings():
    out = np.zeros(N)
    for (modes, clack), blows, ms in LANDINGS:
        out += contacts(blows, BENCH, clack, WOOD_TICK, planks_db=-16.5, touch_ms=ms, knock=modes, loose=0.17,
                        scatter_db=-24.5)
    return pan(out, -1.1)


def scene():
    near = rubbing() + block_slides() + strip_slides() + bar_slides() + lift_scrape()
    near += skids() + squeaks() + loose_ticks() + block_contacts()
    near += clamp_landings() + clamp_bumps() + ratchet() + drop() + settling()
    near += second_contacts() + landings()
    near = signal.sosfilt(signal.butter(3, 130, "high", fs=SR, output="sos"), near)
    return near + signal.fftconvolve(near, echo(), axes=1)[:, :N] + shop()


def band_limit(x):
    return signal.sosfilt(signal.butter(12, 16820, fs=SR, output="sos"), x)


# pitch_hz, left_minus_right_db
STEREO_LEAN = [(250, -1.7), (700, 0.5), (2000, 1.1), (5600, -1)]


def record(dry):
    size = next_fast_len(N, real=True)
    lean_db = read(STEREO_LEAN, np.fft.rfftfreq(size, 1 / SR) + 1)
    leaning = irfft(rfft(dry, size) * how_loud(np.array([lean_db, -lean_db]) / 2), size)[:, :N]
    mix = signal.sosfilt(signal.cheby1(10, .3, 15250, fs=SR, output="sos"), leaning)
    return band_limit(mix)


dry = scene()
out = record(dry)
digitize_waveform(out)
```